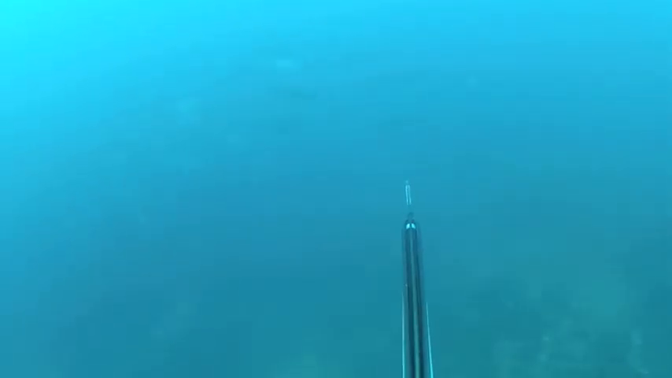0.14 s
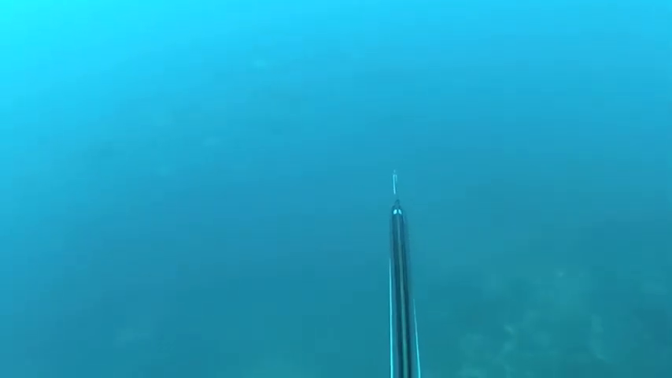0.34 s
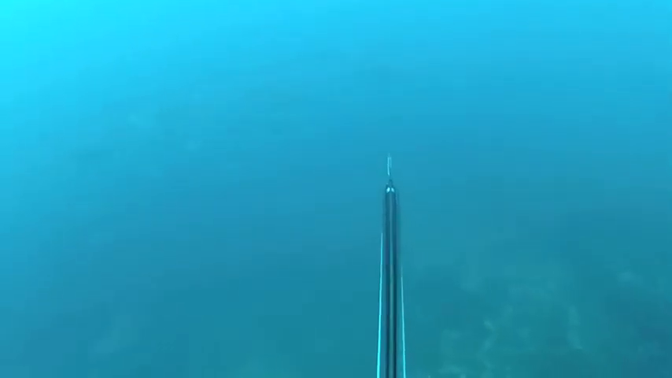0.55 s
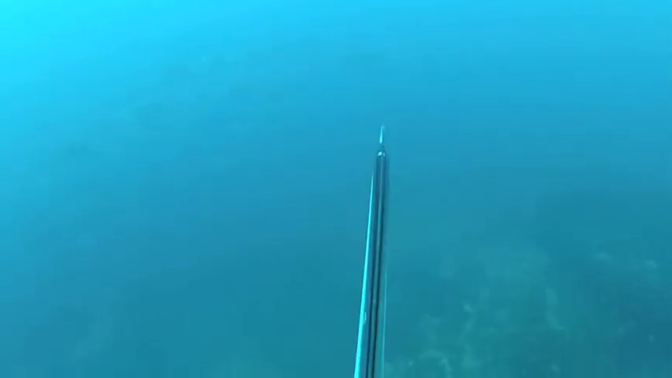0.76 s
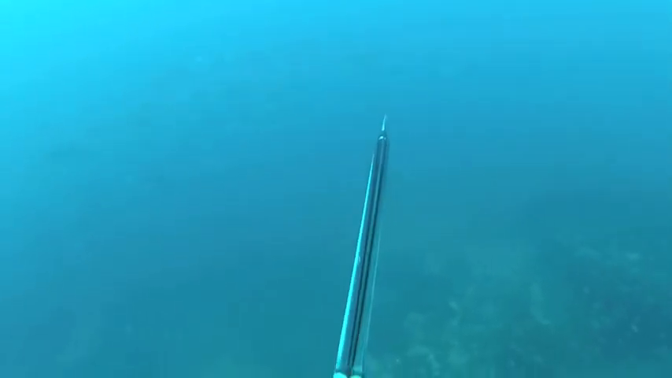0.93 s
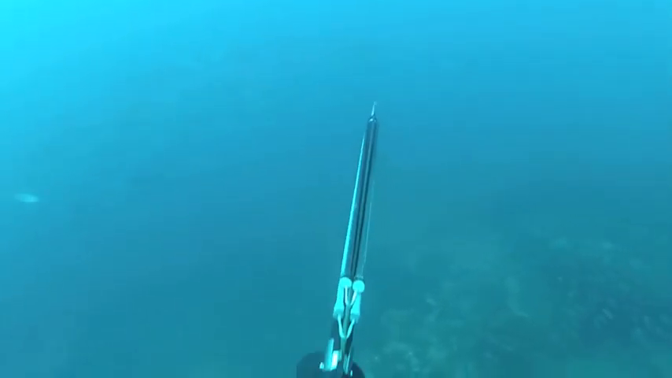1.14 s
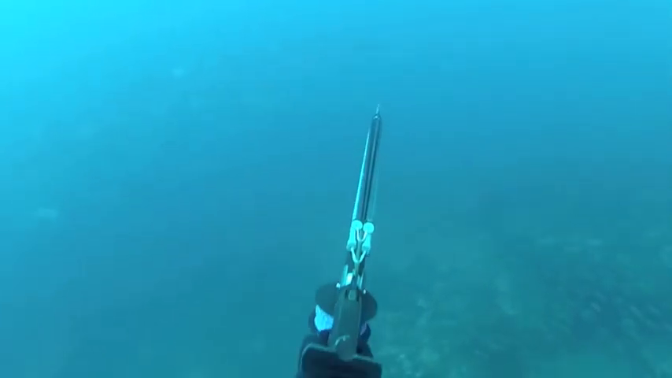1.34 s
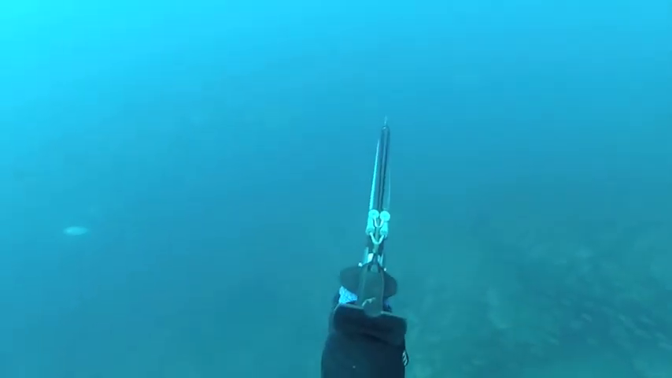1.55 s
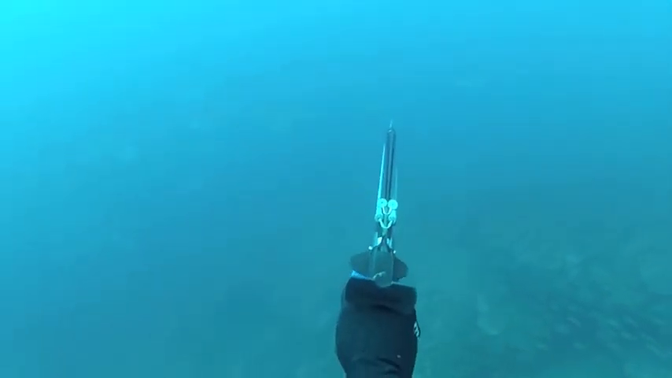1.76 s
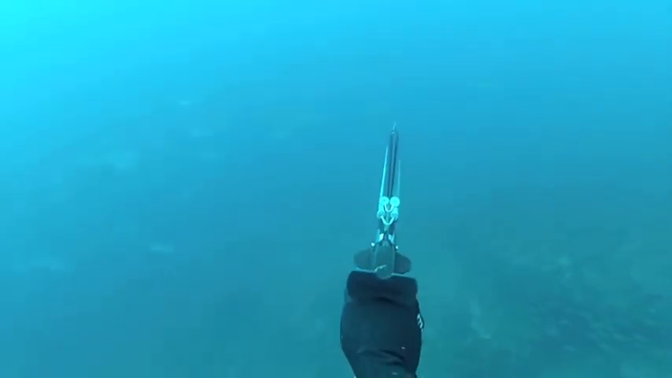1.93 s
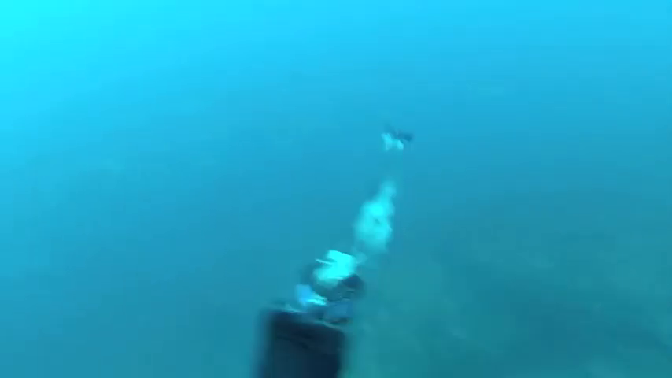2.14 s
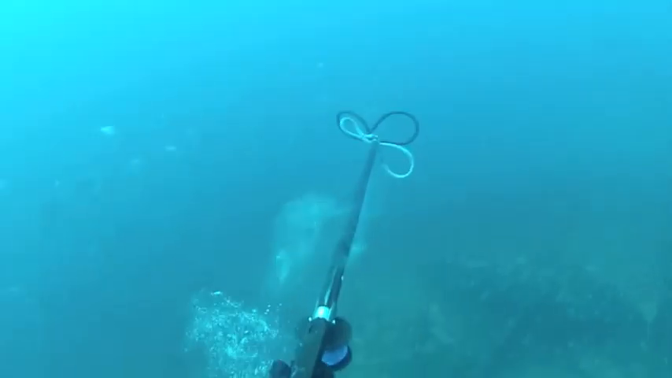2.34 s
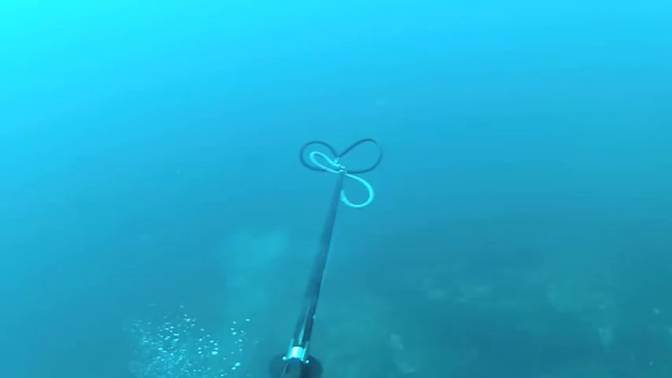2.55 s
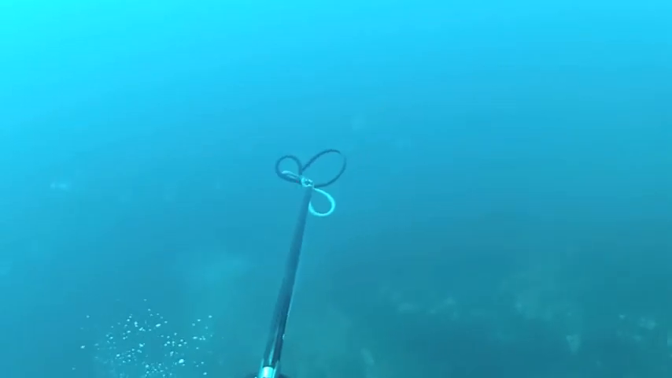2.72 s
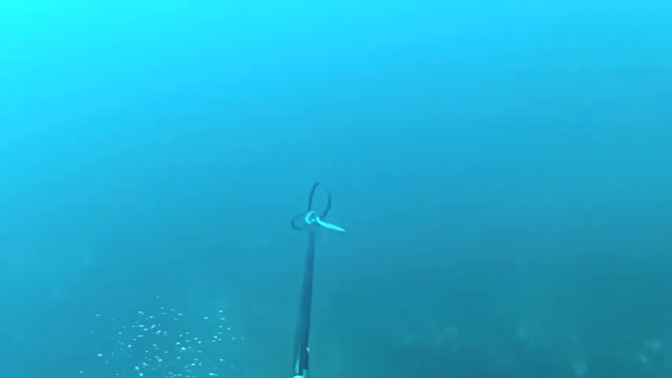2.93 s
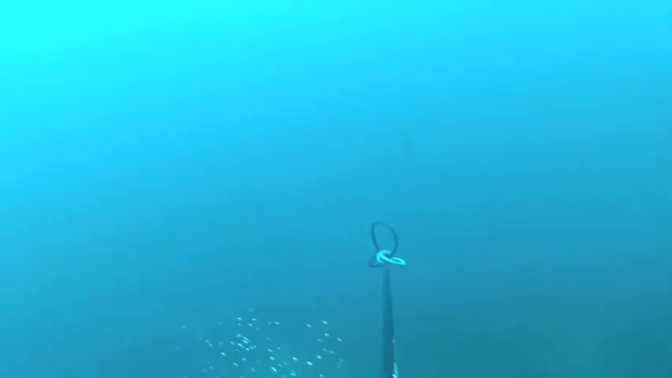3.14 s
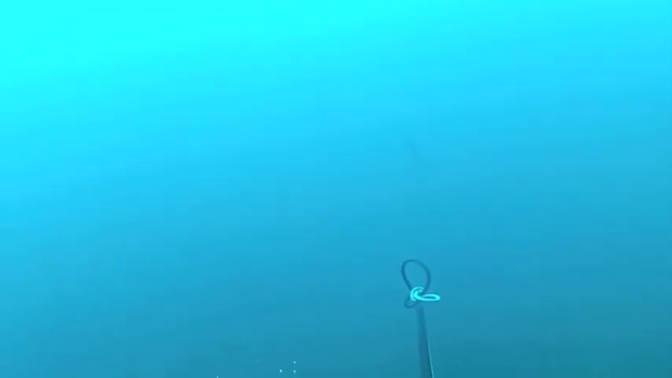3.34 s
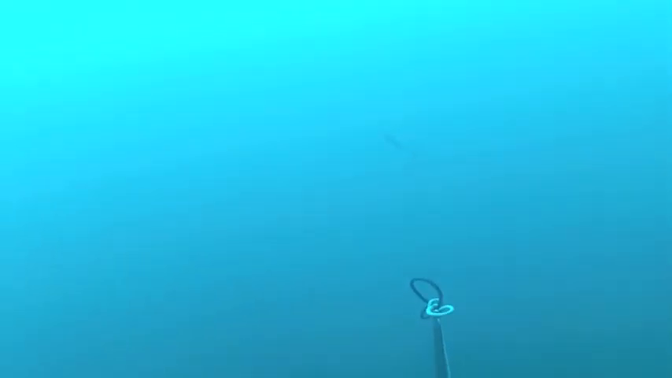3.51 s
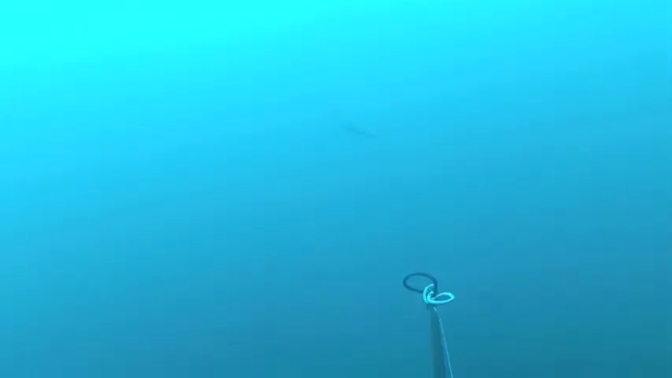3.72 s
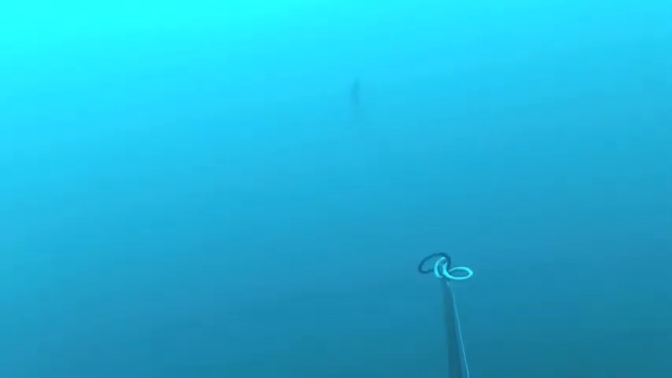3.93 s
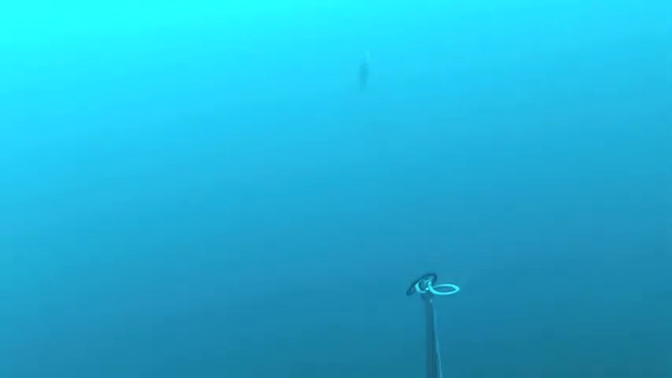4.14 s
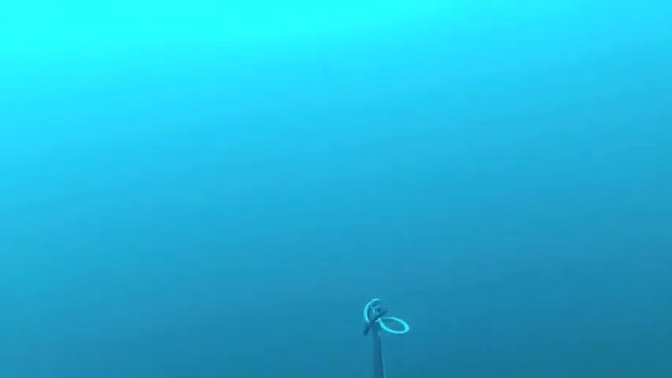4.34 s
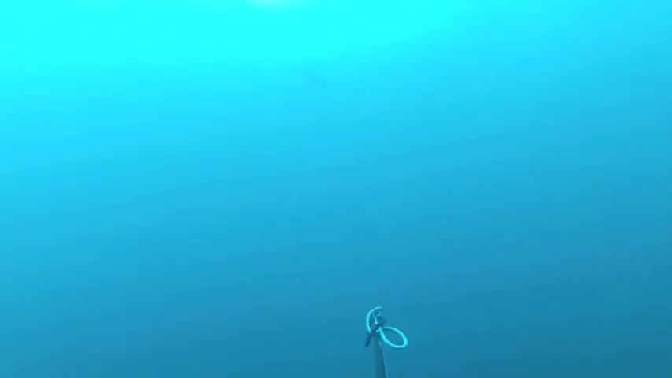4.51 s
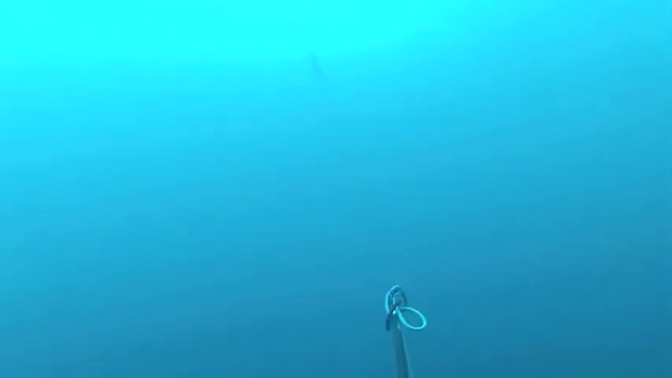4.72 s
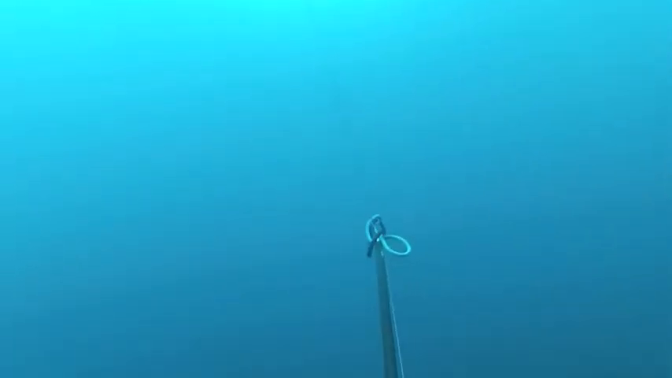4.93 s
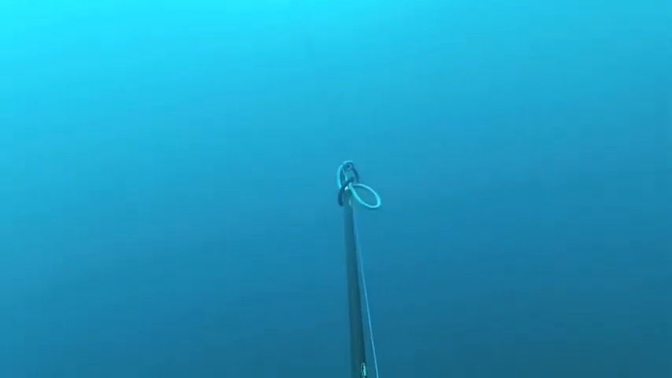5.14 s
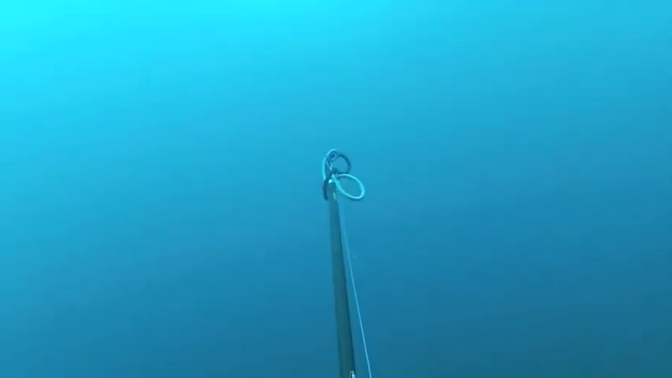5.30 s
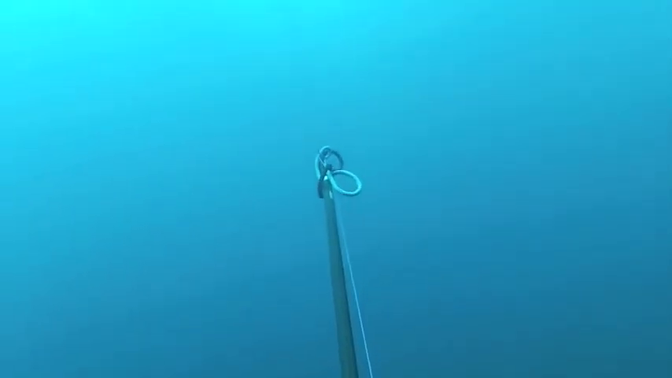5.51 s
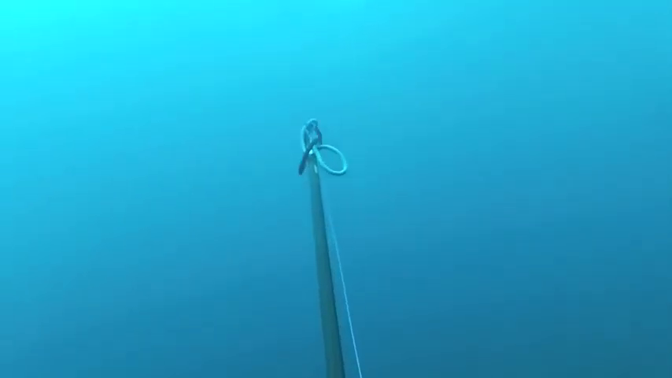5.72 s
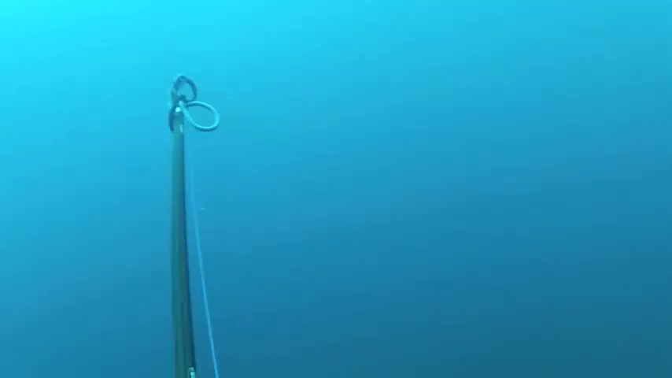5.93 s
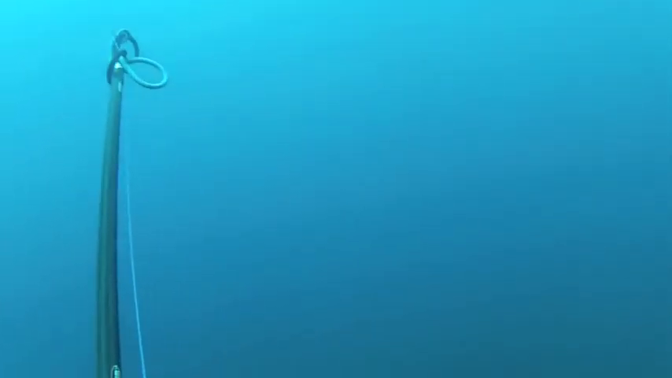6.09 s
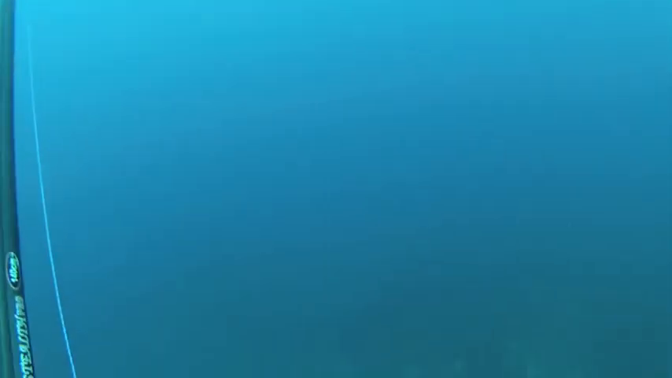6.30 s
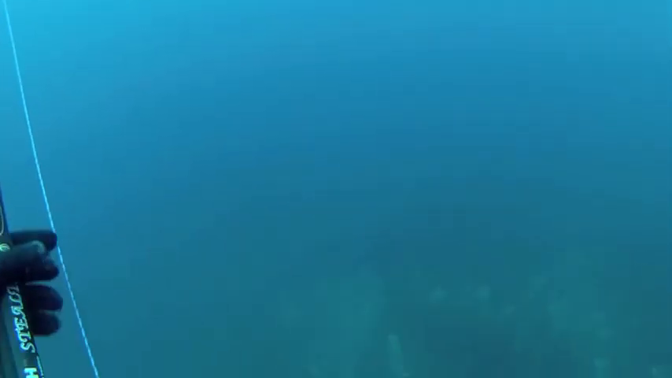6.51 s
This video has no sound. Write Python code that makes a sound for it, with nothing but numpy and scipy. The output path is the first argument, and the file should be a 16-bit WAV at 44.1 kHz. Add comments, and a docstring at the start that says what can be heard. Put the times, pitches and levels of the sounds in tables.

```python
"""Over a reef, a diver fires a rubber-band speargun, heard by a camera in a sealed housing.
Snapping shrimp crackle all round as impulses ringing the housing; moving water is band-limited noise.
A pulse-train croak, a gliding groan and gulps made of swelling sines add low tones.
The shot is a decaying-sine thump that overloads, a noise crack, a modal rattle and struck-mode knocks.
The camera samples slowly and holds each value, which mirrors the sound into the treble."""
import sys
import numpy as np
from scipy import signal
from scipy.fft import rfft, irfft, next_fast_len
from scipy.io import wavfile
from scipy.ndimage import uniform_filter1d

SR = 44100
rng = np.random.default_rng(int(sys.argv[2]) if len(sys.argv) > 2 else 0)


def transcribe(signal):
    """Save signal, clipped to [-1, 1], as a 16-bit WAV file at the path in sys.argv[1]."""
    frames = np.atleast_2d(signal).T
    limited = np.clip(frames, -1, 1)
    pcm = np.round(limited * 32767).astype(np.int16)
    wavfile.write(sys.argv[1], SR, pcm)


N = 293706
T = np.arange(N) / SR  # time [s]


def undb(db):
    """Amplitude gain of a level in dB, by the definition of the decibel."""
    return 10 ** (np.asarray(db) / 20)


def unit(x):
    """Normalization to an rms of 1."""
    return x / np.sqrt(np.mean(x ** 2))


def band(x, lo_hz, hi_hz, order=2):
    """Band limiting by a maximally flat (Butterworth) band-pass."""
    return signal.sosfilt(signal.butter(order, [lo_hz, hi_hz], "bandpass", fs=SR, output="sos"), x)


def ring(x, hz, width_hz):
    """Single resonance: a damped mode with gain 1 at its centre."""
    return signal.lfilter(*signal.iirpeak(hz, hz / width_hz, fs=SR), x)


def walk(rate):
    """Random modulation: Gaussian values, each held 1 / rate s, then smoothed twice."""
    hold = int(SR / rate)
    steps = np.repeat(rng.standard_normal(N // hold + 1), hold)
    smooth = uniform_filter1d(uniform_filter1d(steps, hold), hold)
    return 1.105 * smooth[:N]


def add(out, s, sound):
    """Superposition: mix a short sound in at a time in s."""
    i = int(s * SR)
    out[i:i + len(sound)] += sound[:N - i]


def water():
    """Flow noise past the housing: lumpy churn, deep rumble and thin fizz, all following the stirring."""
    # how far the diver stirs the water, relative to calm: (time [s], level [dB])
    stirring = [(.2, 2.5), (.43, 2), (.52, 6.5), (.67, -0.5), (1.05, 3), (1.3, -0.5), (2.16, 0), (2.21, 29),
                (2.26, 14.5), (2.36, 19.5), (2.56, 4), (2.8, 14.5), (3.08, 6.5), (3.5, 5.5), (4.2, 2),
                (4.5, 0.5), (5.2, 2.5), (6.66, 4)]
    # resonances that make the fizz hollow: (frequency [Hz], width [Hz], level [dB])
    hollows = [(529, 31, 6), (752, 100, 0), (900, 2400, -8)]
    churn_db, rumble_db, fizz_db = -59, -62.5, -67  # in calm water
    rumble_follows, fizz_follows = 0.28, 1.17  # dB for each dB of stirring
    rumble_grows_db_per_s = 0.7
    stir_db = np.interp(T, *np.transpose(stirring))

    churn = unit(ring(band(rng.standard_normal(N), 75, 355), 255, 366))
    churn *= undb(churn_db + stir_db + 3.07 * walk(30) + 1.6 * walk(9.9))

    rumble = unit(band(rng.standard_normal(N), 28, 56, order=1))
    rumble *= undb(rumble_db + rumble_grows_db_per_s * T + rumble_follows * stir_db + 1.7 * walk(13))

    hiss = band(rng.standard_normal(N), 340, 2630)
    fizz = unit(sum(undb(db) * ring(hiss, hz, width) for hz, width, db in hollows))
    fizz *= undb(fizz_db + fizz_follows * stir_db + 3.57 * walk(40))
    return churn + rumble + fizz


def housing(lower, upper, split_hz=2850):
    """Modal superposition: input rings the housing's modes, neighbours having opposite sign."""
    # modes of the camera housing: (frequency [Hz], width [Hz], relative level [dB])
    modes = [(1015, 144, -24), (1439, 49, -11.5), (1677, 109, -4), (2125, 224, 0), (2542, 283, -2.5),
             (3253, 686, -5.5), (3764, 188, 1), (4122, 225, -8), (5070, 710, -10.5)]
    out = 0
    for k, (hz, width, db) in enumerate(modes):
        drive = lower if hz < split_hz else upper
        out = out + (-1) ** k * undb(db) * ring(drive, hz, width)
    return out


def shrimp():
    """Impulse excitation by collapsing bubbles: near snaps over a far crackle and its blurred wash."""
    # the loudest snaps: (time [s], peak level [dB], drive of upper modes minus lower modes [dB])
    loudest = [(0.145, -28, 9), (0.173, -30, -2), (0.2478, -23, -3), (0.3025, -26, 1), (0.3465, -27, -4),
               (0.573, -24.5, 5), (0.667, -27, 3), (0.729, -26.5, 11), (0.773, -25, -2), (0.8042, -27, 5),
               (1.0582, -22, -0.5), (1.0798, -23.5, -2), (1.1645, -16.5, 3), (1.2316, -21, 0),
               (1.2596, -23.5, 2), (1.4141, -25.5, -3), (1.456, -21.5, 2), (1.5676, -19, 5),
               (1.8439, -22.5, 0), (1.9522, -24.5, -1), (2.009, -19, 1.5), (2.0405, -23.5, 3),
               (2.0583, -22.5, 1), (2.1062, -22.5, 3.5), (2.2894, -21, -16), (2.3231, -19.5, -5),
               (2.617, -14.5, 2), (2.648, -25.5, -1), (2.7355, -25, -3), (2.7602, -23, -8),
               (2.7797, -24, -7), (2.8696, -22, -3), (3.1694, -28, 6), (3.1779, -21, 1), (3.1999, -21, 1),
               (3.3888, -25, -4), (3.4145, -26, -1), (3.4373, -24.5, -4), (3.4537, -24.5, 3),
               (3.5746, -27, -3), (3.5985, -20.5, 0), (3.7373, -25, 0), (3.9334, -22, -1),
               (4.0576, -18, -2.5), (4.171, -20, 10), (4.2055, -21, -3), (4.2492, -22, 3), (4.304, -22, 4),
               (4.3331, -20.5, 3), (4.366, -28, -12), (4.4428, -20.5, 2.5), (4.6411, -21, 1),
               (4.667, -23, -2), (4.9583, -25.5, 4), (5.1439, -23, -1), (5.2004, -22.5, -5),
               (5.4789, -24, 3), (5.5686, -20, 4), (5.838, -24, -1), (5.9442, -23, -1), (5.9964, -22.5, -2),
               (6.0185, -20.5, 2), (6.1018, -21.5, -1), (6.22, -17.5, 1), (6.295, -23, -3),
               (6.386, -22, -5), (6.491, -20.5, -13), (6.4981, -21.5, -3), (6.5037, -21.5, 4),
               (6.541, -19.5, 0), (6.584, -24, 10), (6.6091, -20.5, -2), (6.6174, -19, -1),
               (6.6522, -21.5, -4)]
    surface_lag_s, near_echo_db = .0083, -13  # the surface sends each snap back inverted
    far_db, far_drift_db = -42, -0.02  # crackle of the whole reef
    s, db, tilt_db = np.transpose(loudest)
    lag = int(surface_lag_s * SR)

    # a little fizz around each collapse, the collapse itself at sample 50
    fizz_skirt = np.exp(-np.abs(T[:900] - T[50]) / .0004)
    bursts = .1 * rng.standard_normal((len(s), 900)) * fizz_skirt
    bursts[:, 50] = 1
    half_tilt = undb(tilt_db / 2)[:, None]
    snaps = housing(bursts / half_tilt, bursts * half_tilt)
    near = np.zeros(N)
    for at, level, snap in zip(s - T[50], db, snaps):
        add(near, at, undb(level) * snap / np.abs(snap).max())
    near[lag:] -= undb(near_echo_db) * near[:-lag]

    size = undb(np.minimum(4.5 * rng.exponential(size=N), 19.))
    happens = rng.random(N) < .02  # chance per sample
    clicks = size * happens * np.sign(rng.standard_normal(N))
    tilt = undb(1.6 * rng.standard_normal(N))
    flurries = undb(0.56 * walk(14))  # colonies snap in flurries
    crackle = np.array([clicks / tilt, clicks * tilt]) * flurries
    crackle[:, lag:] -= 0.26 * crackle[:, :-lag]

    wash = rng.standard_normal(N) * undb(3.0 * walk(25))
    far = unit(housing(*crackle)) + unit(housing(wash, wash))
    return near + undb(far_db + far_drift_db * walk(2.88)) * unit(far)


def croak():
    """Pulse-train excitation: uneven pulses ring a low cavity with weak upper resonances."""
    span_s = (.457, .578)
    # from start to end of the span: pulses per s, cavity Hz, pulse level dB ahead of the band-pass
    rates, cavity_hz, levels_db = (60, 47), (173, 148), (-33, -31)
    out = np.zeros(N)
    at, t = span_s[0], T[:2500]
    for stretch, scatter in rng.standard_normal((30, 2)):
        if at < span_s[1]:
            f = np.interp(at, span_s, cavity_hz)
            pulse = np.exp(-t / 0.013) * np.sin(2 * np.pi * f * t)
            pulse += 1.02 * np.exp(-t / 0.0064) * np.sin(2 * np.pi * 1.44 * f * t)
            pulse += 0.063 * np.exp(-t / 0.0034) * np.sin(2 * np.pi * 520 * t)
            pulse += 0.13 * np.exp(-t / .003) * np.sin(2 * np.pi * 1100 * t)
            add(out, at, undb(np.interp(at, span_s, levels_db) + 0.62 * scatter) * pulse)
            at += (1 + 0.017 * stretch) / np.interp(at, span_s, rates)
    return band(out, 137, 2000)


def groan():
    """Harmonic series: three partials share one gliding phase, the integral of the pitch."""
    # glide: (time [s], pitch [Hz], level of first partial [dB], second partial minus first [dB])
    glide = [(4.143, 105, -55, -6), (4.158, 122, -33.5, -1), (4.168, 133, -34, 4.5),
             (4.181, 151, -30, -1.5), (4.188, 109, -50, 7), (4.206, 98.6, -37.5, 6.5), (4.235, 87, -47, 1),
             (4.265, 80.4, -52, 9)]
    s, hz, db, second_db = np.transpose(glide)
    turn = 2 * np.pi * np.cumsum(np.interp(T, s, hz)) / SR
    upper = np.sin(2 * turn) + 0.089 * np.sin(3 * turn)
    tone = np.sin(turn) + undb(np.interp(T, s, second_db)) * upper
    return undb(np.interp(T, s, db, left=-120, right=-120)) * tone


def gulps(rows):
    """Enveloped oscillation: each gulp is a few cycles that swell and fade, rising a little in pitch."""
    out, t = np.zeros(N), T[:4000]
    for (s, db, hz, rise_ms), turn in zip(rows, rng.random(len(rows))):
        u = t * 1000 / rise_ms  # the swell peaks at u = 1
        swell = (u * np.exp(1 - u)) ** 1.5
        cycles = hz * t * (0.95 + 0.014 * u) + turn
        add(out, s - rise_ms / 1000, undb(db) * swell * np.sin(2 * np.pi * cycles))
    return out


def wake(count=40):
    """Random scatter: rows of small gulps spread over the seconds after the shot."""
    start_s, end_s = 2.24, 3.65
    level_db, scatter_db, pitch_hz, rise_ms = -42.5, 3.5, 240, 2.64
    shift, level, pitch, rise = rng.standard_normal((count, 4)).T
    part = np.clip((np.arange(count) + shift) / count, 0, 1)
    return np.transpose([start_s + part * (end_s - start_s), level_db + scatter_db * level,
                         pitch_hz * 2 ** (.4 * pitch), rise_ms * 2 ** (.6 * rise)])


def gun_modes(x, struck_hz, spread, damping=6.0):
    """Modal superposition: the gun's modes, strongest near the part struck; water damps them."""
    # modes of the gun: (frequency [Hz], relative level [dB], t60 before the water's damping [s])
    modes = [(526, -14.5, 0.059), (717, -7.5, 0.053), (1088, -9, 0.15), (1403, -8, 0.31), (1687, 0, 0.17),
             (1906, -9, 0.086), (2105, -8, 0.15), (2114, 2, 0.064), (2367, -11, 0.31), (2700, -20, 0.44),
             (3170, -29, 0.081), (3900, -7, 0.019), (5100, -18, 0.096), (6050, -58.5, 0.12)]
    out = 0
    for k, (hz, db, t60) in enumerate(modes):
        octaves = np.log2(hz / struck_hz)
        gain = undb(db - 6 * (octaves / spread) ** 2)
        width_hz = damping * np.log(1000) / np.pi / t60  # faster decay means a wider resonance
        out = out + (-1) ** k * gain * ring(x, hz, width_hz)
    return out


def thump():
    """Damped oscillation: recoil as sines that hold for 0.71 of a cycle, then decay."""
    # parts of the recoil: (time [s], peak level [dB], frequency [Hz], t60 [s])
    parts = [(2.1584, -21.5, 212, 0.016), (2.1638, 4, 266, 0.0088), (2.169, -18, 50, 0.2),
             (2.178, -17.5, 106, 0.037), (2.189, -22.5, 535, 0.063)]
    out, t = np.zeros(N), T[:8820]
    for s, db, hz, t60 in parts:
        decay = np.exp(-np.log(1000) * np.maximum(t - 0.71 / hz, 0) / t60)
        add(out, s, -undb(db) * decay * np.sin(2 * np.pi * hz * t))
    return out


def knocks():
    """Impact excitation: a brief noisy contact rings the gun's modes around the part struck."""
    # knocks and scrapes on the gun: (time [s], peak level [dB], frequency of the part struck [Hz],
    # spread [octaves], decay time of the contact [ms])
    strikes = [(2.1906, -13.5, 2200, 0.4, 2.1), (2.1976, -13, 1500, 1.2, 1.2),
               (2.2026, -9, 2080, 0.56, 1.8), (2.21, -11, 2300, 0.27, 0.87), (2.227, -19, 2360, 0.56, 2.5),
               (2.241, -21.5, 2300, 0.44, 2.3), (2.305, -27, 1680, 0.22, 21),
               (2.317, -14, 2060, 0.51, 0.28), (2.4027, -19, 1500, 0.34, 3.3),
               (2.694, -18, 1170, 0.85, 1.9), (2.785, -22.5, 2080, 0.6, 3.5),
               (2.7943, -11.5, 1970, 0.3, 0.97), (2.884, -21.5, 1500, 1.2, 14),
               (4.02, -41.5, 557, 0.22, .4), (4.305, -26, 686, 1.45, 0.38), (5.609, -33, 1100, 1.2, 0.36)]
    out, t = np.zeros(N), T[:8820]
    for s, db, hz, spread, contact_ms in strikes:
        contact = rng.standard_normal(len(t)) * np.exp(-t * 1000 / contact_ms)
        contact[0] += 4.  # the first touch is the hardest
        knock = band(gun_modes(contact, hz, spread), hz / 4 ** spread, hz * 4 ** spread)
        add(out, s, undb(db) * knock / np.abs(knock).max())
    return out


def crack():
    """Exponential decay of noise: the release cracks twice, both dying at the same rate."""
    # trigger, then bands: (time [s], starting level [dB])
    releases = [(2.1632, -8.5), (2.1652, -4)]
    fall_db_per_s = 4000
    noise = rng.standard_normal(N)
    colour = unit(ring(noise, 2110, 660)) + 0.2 * unit(band(noise, 500, 5800))
    envelope = sum(undb(db - fall_db_per_s * np.maximum(T - s, 0)) * (T >= s) for s, db in releases)
    return envelope * unit(colour)


def rattle():
    """Random excitation of modes: chatter rings the gun, with thrashed water, as the shaft leaves."""
    # the shaft and bands leaving the barrel: (time [s], level [dB])
    course = [(2.167, -26), (2.178, -32), (2.19, -18), (2.197, -12.5), (2.21, -21), (2.217, -27),
              (2.245, -41), (2.3, -39), (2.45, -69)]
    chatter = rng.standard_normal(N) * undb(2. * walk(450))
    modes = unit(gun_modes(chatter, 1600, 2.2, damping=3.5))
    thrashed_water = .3 * unit(band(chatter, 1500, 5200))
    s, db = np.transpose(course)
    return undb(np.interp(T, s, db, left=-120, right=-120)) * unit(modes + thrashed_water)


def gun():
    """Superposition of the shot: recoil thump, crack, rattle of the leaving shaft, and knocks."""
    return thump() + knocks() + crack() + rattle()


def scene():
    """Superposition of all sources at two close capsules that differ a little in the deep bass."""
    # gulps of water and bubbles of trapped air:
    # (time of the peak [s], peak level [dB], nominal pitch [Hz], rise [ms])
    gulp_rows = [(0.734, -42, 227, 5.3), (0.908, -33, 170, 1.4), (0.947, -31, 191, 5), (0.965, -39, 180, 4),
                 (0.985, -35, 190, 5), (1.779, -37, 263, 2.6), (2.283, -30, 190, 2),
                 (2.312, -28.5, 200, 1.7), (2.407, -13.5, 280, 1.67), (2.418, -25.5, 209, 3),
                 (2.809, -35, 322, 2.4), (2.861, -37.5, 450, 2.5), (2.891, -35, 147, 3.1),
                 (3.037, -34, 302, 0.86), (3.096, -38.5, 268, 1.8), (3.7, -32.5, 310, 5),
                 (3.775, -45, 694, 2.6), (3.797, -32, 320, 2.5), (3.824, -27.5, 180, 1.1),
                 (4.022, -36, 240, 2.1), (4.186, -37.5, 457, 2.2), (4.307, -25.5, 180, 1.1),
                 (4.872, -38.5, 220, 2.5), (4.97, -50, 720, 3.5), (5.074, -39.5, 298, 4.1),
                 (5.083, -42.5, 780, 4), (5.402, -32, 180, 3), (5.413, -27, 261, 4.1),
                 (5.437, -23.5, 140, 3.8), (5.535, -31, 215, 3.3), (5.551, -31, 252, 3.9),
                 (5.611, -35, 140, 0.87), (5.773, -34, 195, 2.6), (5.836, -35, 342, 2.1),
                 (5.866, -34.5, 302, 1.7), (5.91, -24, 230, 4.7), (6.024, -34, 230, 0.77),
                 (6.195, -43, 780, 4.3), (6.225, -48.5, 780, 11), (6.575, -40, 300, 1.6)]
    mono = water() + shrimp() + croak() + groan() + gulps(gulp_rows) + gulps(wake()) + gun()
    side = undb(-30.0) * band(mono, 32, 58, order=1)
    return np.array([mono - side, mono + side])


def record(dry):
    """Overload, then sample and hold: images mirror about the sampling rate under a sinc slope."""
    hold_hz, soft_hz, top_hz = 12000, 15300, 16468
    size = next_fast_len(N)
    hz = np.arange(size // 2 + 1) * SR / size
    loud = np.clip(dry, -.82, .82)
    base = signal.sosfilt(signal.ellip(8, .2, 60, .495 * hold_hz, fs=SR, output="sos"), loud)
    sampled = base * (1 + 2 * np.cos(2 * np.pi * hold_hz * T))  # only the first pair of images
    held = irfft(rfft(sampled, size) * np.sinc(hz / hold_hz), size)[:, :N]
    # a partial cut of the treble, then a steep one
    held = signal.sosfilt(signal.ellip(10, .2, 33, soft_hz, fs=SR, output="sos"), held)
    return signal.sosfilt(signal.ellip(10, .2, 80, top_hz, fs=SR, output="sos"), held)


dry = scene()
out = record(dry)
transcribe(out)
```